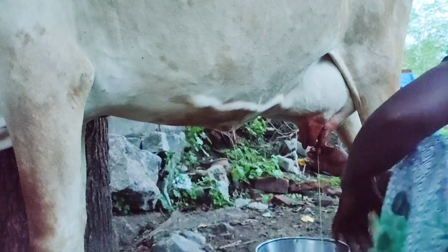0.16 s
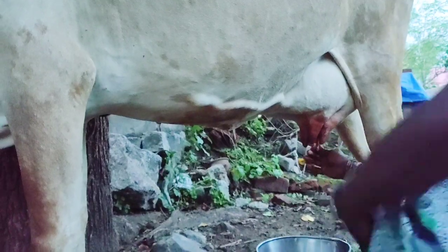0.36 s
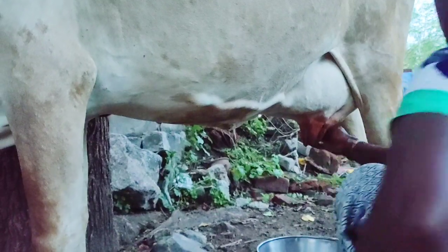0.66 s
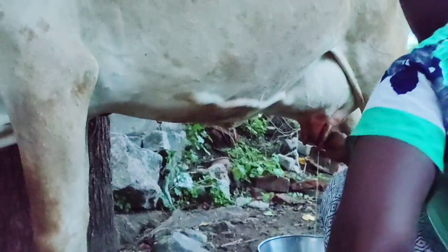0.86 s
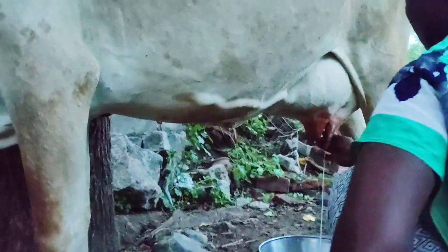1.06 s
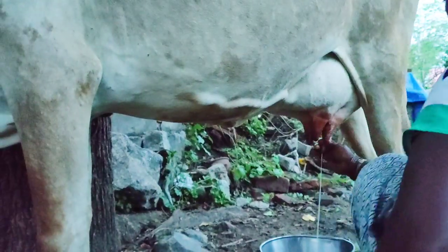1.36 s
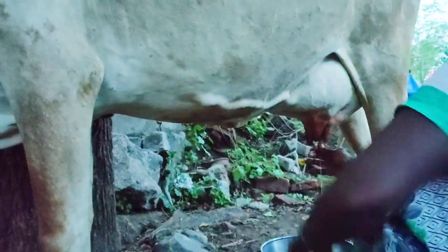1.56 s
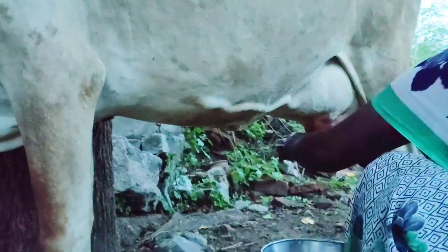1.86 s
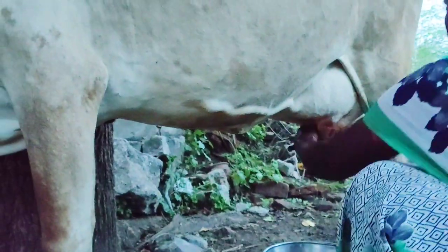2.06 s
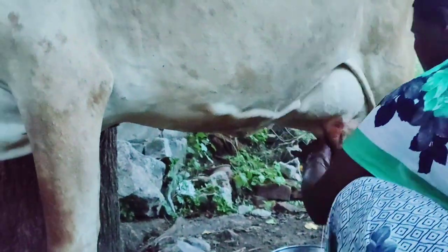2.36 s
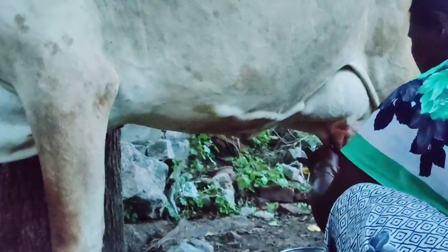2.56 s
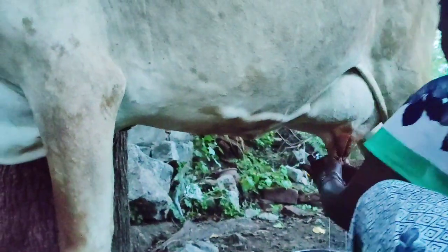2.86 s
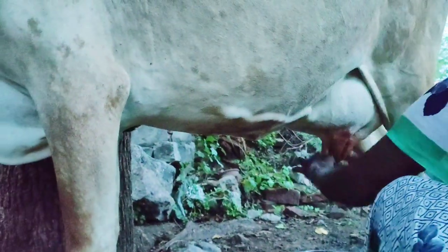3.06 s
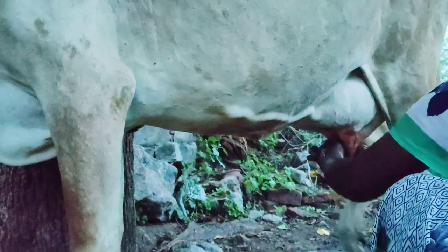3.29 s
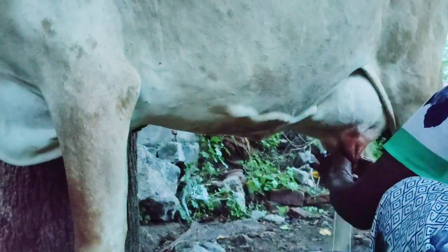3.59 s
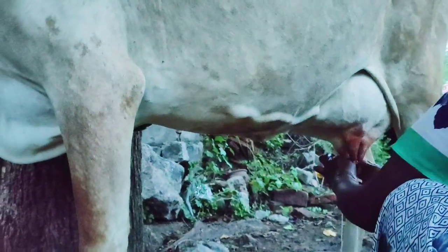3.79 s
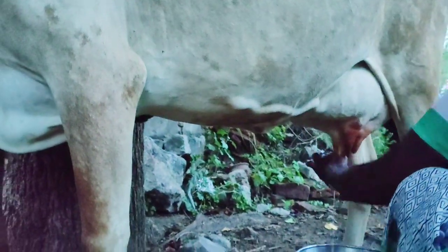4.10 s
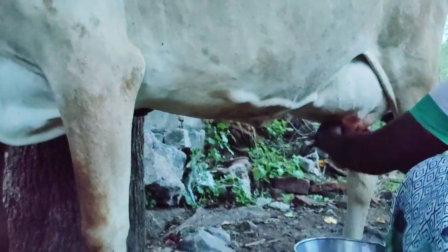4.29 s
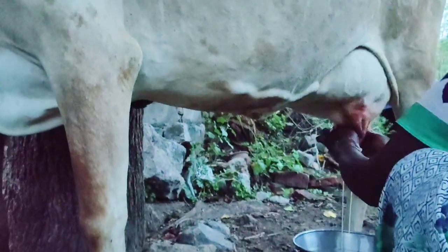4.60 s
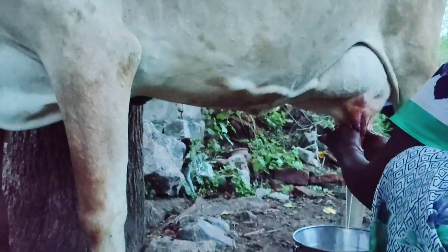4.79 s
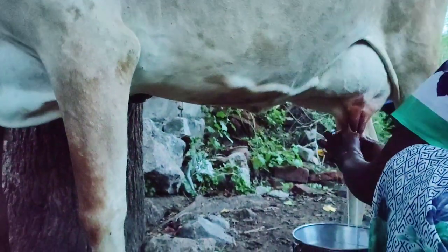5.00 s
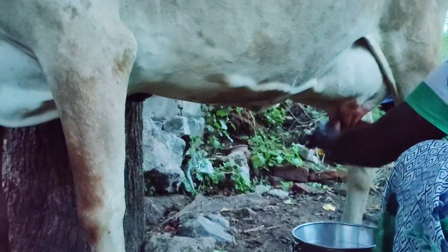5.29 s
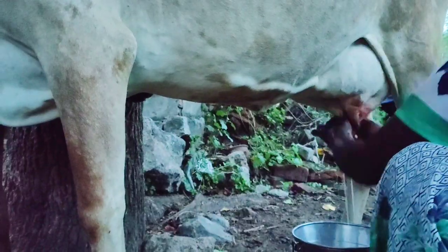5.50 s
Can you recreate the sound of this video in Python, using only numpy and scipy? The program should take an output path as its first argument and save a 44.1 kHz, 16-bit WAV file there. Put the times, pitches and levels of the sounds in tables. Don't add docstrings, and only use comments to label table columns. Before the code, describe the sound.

Hand milking outdoors: thin squirts spatter on a metal pail with sliding, tinny ringing, pauses between them filled by soft steady insect buzz.

```python
import sys
import numpy as np
from scipy import signal
from scipy.fft import rfft, irfft, next_fast_len
from scipy.io import wavfile
from scipy.ndimage import uniform_filter1d, map_coordinates

SR = 44100
rng = np.random.default_rng(int(sys.argv[2]) if len(sys.argv) > 2 else 0)


def pcm_store(signal):
    levels = np.round(np.clip(np.atleast_2d(signal), -1, 1) * 32767)
    wavfile.write(sys.argv[1], SR, levels.astype(np.int16).T)


def makeup_ratio(level_db):
    decades = np.asarray(level_db, float) / 20
    return 10 ** decades


N = 249165


def unit(x):
    return x / np.sqrt(np.mean(np.abs(x) ** 2) + 1e-20)


def along(points, hz):
    f, v = np.transpose(points)
    return np.interp(np.log(hz + 1), np.log(f + 1), v)


def curve(points):
    s, v = np.transpose(points)
    return np.interp(np.arange(N) / SR, s, v)


def wobble(rate):
    knots = rng.standard_normal(int(N * rate / SR) + 4)
    return map_coordinates(knots, [np.arange(N) * rate / SR], order=1)


def filtered(x, response):
    m = next_fast_len(N + 8192)
    return irfft(rfft(x, m) * response(np.fft.rfftfreq(m, 1 / SR)), m)[..., :N]


def spread(a, b, alike):
    turn = np.arccos(np.clip(alike, -1, 1)) / 2
    return np.array([np.cos(turn) * a + np.sin(turn) * b, np.cos(turn) * a - np.sin(turn) * b])


def rush(spectrum, alike, patchy_db):
    hz, _, z = signal.stft(rng.standard_normal((2, N)), SR, nperseg=512)
    field = uniform_filter1d(rng.standard_normal(z.shape[1:]), size=4, axis=0)
    field = uniform_filter1d(field, size=8, axis=1)
    z = z * makeup_ratio(patchy_db * unit(field))
    pair = signal.istft(spread(z[0], z[1], along(alike, hz)[:, None]), nperseg=512)[1][:, :N]
    return unit(filtered(pair, lambda f: makeup_ratio(along(spectrum, f))))


def shaken(shape, width_hz):
    pole = np.exp(-np.pi * np.abs(width_hz) / SR)
    kicks = rng.standard_normal(shape) + 1j * rng.standard_normal(shape)
    return unit(signal.lfilter([1], np.poly([pole, pole]), kicks))


def tones(rows, width_hz, rough, edge_db, tail, alike):
    size, lead, longest = SR // 8 * 4, .025, .38
    out, t = np.zeros((2, N + 2 * size)), np.arange(size) / SR
    for start, rise_ms, fall_ms, hz0, hz1, db in rows:
        flutter = shaken((2, size // 4), 4 * width_hz).repeat(4, axis=1)
        end = min(lead + (rise_ms + fall_ms) / 1000, longest)
        peak = min(lead + rise_ms / 1000, end)
        knots = np.array([0, lead, peak, end, end + min(tail, .1)])
        level = makeup_ratio(db + np.interp(t, knots, [-40, edge_db, 0, edge_db, -50], right=-200))
        waver = 1 + .004 * np.sin(2 * np.pi * (9 * t + start * hz0))
        pitch = np.interp(t, [lead, end], [hz0, hz1]) * waver
        left = 1 - rough + rough * flutter[0]
        right = (1 - rough) * 1j + rough * flutter[1]
        swing = spread(left, right, along(alike, hz0))
        carrier = np.exp(2j * np.pi * np.cumsum(pitch) / SR)
        at = size + round((start - lead) * SR)
        out[:, at:at + size] += np.sqrt(2) * level * np.real(swing * carrier)
    return out[:, size:size + N]


def swells(rows, rise_share=.38):
    return [(s, rise_share * ms, (1 - rise_share) * ms, hz0, hz1, db) for s, ms, hz0, hz1, db in rows]


# (frequency [Hz], level [dB per Hz])
AIR_SPECTRUM = [(21, -43), (35, 1), (92, -1.5), (132, -8), (168, -8), (340, -10), (600, -17), (860, -15.5),
                (1390, -26), (2000, -23), (3590, -26), (4300, -23.5), (5590, -64.5), (9460, -120)]
# (frequency [Hz], left-right likeness [-1 to 1])
FAR_ALIKE = [(60, .8), (400, .75), (900, .3), (8000, .3)]


def rumble_and_rustle():
    rumble_db = -61.5 + 1.6 * wobble(1.5)
    rustle_db = -65 + wobble(2.3)
    air = rush(AIR_SPECTRUM, FAR_ALIKE, patchy_db=1.2)
    rumble = filtered(air, lambda f: f < 220)
    return makeup_ratio(rumble_db) * unit(rumble) + makeup_ratio(rustle_db) * unit(air - rumble)


# (start [s], length [ms], start pitch [Hz], end pitch [Hz], level [dB])
BIRD_NOTES = [(.56, 140, 270, 330, -64), (2.5, 350, 285, 280, -66), (1.6, 300, 890, 850, -73),
              (3.24, 170, 790, 740, -67), (3.94, 120, 810, 830, -60), (4.08, 120, 830, 800, -61),
              (1.92, 110, 3720, 3620, -69), (2.03, 60, 3550, 3400, -76), (2.09, 70, 3270, 3220, -76),
              (1.98, 220, 180, 180, -64), (.2, 350, 1030, 980, -69), (4.25, 200, 880, 800, -70),
              (5.05, 200, 900, 850, -71)]


def birds():
    return tones(swells(BIRD_NOTES), width_hz=18, rough=.4, edge_db=-6, tail=.04, alike=FAR_ALIKE)


# (time [s], pitch [Hz], peak level [dB], decay by 60 dB [s])
HOOF_STEP = (1.296, 135, -38, .04)


def hoof():
    start, hz, db, t60 = HOOF_STEP
    t = np.clip(np.arange(N) / SR - start, 0, None)
    return makeup_ratio(db - 60 * t / t60) * np.sin(2 * np.pi * hz * t)


# (frequency [Hz], level [dB per Hz])
CICADA_SPECTRUM = [(2410, -57.5), (4150, -30.5), (4350, -14.5), (4780, -8.5), (5010, -0.5), (5500, -6.5),
                   (6030, -9.5), (6380, -12), (7250, -15), (8000, -31.5), (10400, -65), (17600, -120)]
# (time [s], level [dB])
CHORUS_LEVEL = [(0, -58.5), (2.5, -56), (5.65, -53)]
# (pitch [Hz], pulse rate [per s], level re chorus [dB])
NEAR_SINGERS = [(4930, 66, -7), (6000, 57, -14)]


def cicadas():
    t = np.arange(N) / SR
    chorus = rush(CICADA_SPECTRUM, FAR_ALIKE, patchy_db=2.5)
    for hz, rate, db in NEAR_SINGERS:
        beat = np.cumsum(rate * (1 + .02 * wobble(3))) / SR
        pulses = np.exp(1.6 * np.cos(2 * np.pi * beat))
        voice = np.real(shaken((2, N), 14) * np.exp(2j * np.pi * hz * t))
        chorus = chorus + makeup_ratio(db) * unit(pulses * voice)
    return makeup_ratio(curve(CHORUS_LEVEL) + 1.2 * wobble(1.866)) * chorus


# (lower [Hz], upper [Hz])
MODE_GROUP_EDGES = (1500, 3300)
MIDDLE_SHARE = 0.51
FAINT_HZ, FAINT_MS, FAINT_PER_S = (1487, 5230), (140, 310), 18
FAINT_DB, FAINT_SCATTER_DB = -16, 1


def faint_modes():
    notes = []
    for jet, (_, slide, ringing_db) in zip(JET_FORCE, WALL_STATE):
        s, force = np.transpose(jet)
        count = int(FAINT_PER_S * (s[-1] - s[0]))
        for k, (late, long, high, size) in enumerate(rng.random((30, 4))[:count]):
            start = s[0] + (k + late) / FAINT_PER_S
            ms = np.interp(long, [0, 1], FAINT_MS)
            hz = np.exp(np.interp((k * .618 + high / 6) % 1, [0, 1], np.log(FAINT_HZ)))
            db = np.interp([start, start + ms / 1000], s, force).min()
            if db <= -52:
                continue
            if hz < MODE_GROUP_EDGES[1]:
                db += MIDDLE_SHARE * np.interp(start, *np.transpose(JET_AIM))
            db += ringing_db + FAINT_DB + FAINT_SCATTER_DB * (2 * size - 1)
            notes.append((start, ms, hz, hz * (1 + 2 * slide * ms / 1000), db))
    return tones(swells(notes), width_hz=16, rough=.6, edge_db=-5.5, tail=.08, alike=POT_ALIKE)


# (start [s], length [ms], pitch [Hz], level [dB])
DEEP_NOTES = [(0, 32, 1030, -45.5), (0.022, 165, 1165, -59), (.83, 27, 1156, -47.5),
              (0.849, 81, 1216, -38.5), (0.849, 102, 1124, -33.5), (.83, 300, 1003, -35.5),
              (1.0, 290, 1125, -25.5), (1.03, 86, 1175, -34.5), (1.04, 170, 1034, -44),
              (1.19, 235, 1154, -27), (1.34, 69, 1125, -34), (2.21, 170, 976, -45), (2.32, 194, 1035, -43),
              (2.371, 250, 960, -49), (2.46, 127, 1080, -43), (2.53, 264, 1039, -52.5),
              (3.471, 116, 1341, -38.5), (3.48, 143, 950, -41.5), (3.53, 134, 1191, -35),
              (3.731, 106, 1220, -45.5), (4.491, 145, 952, -42.5), (4.609, 54, 969, -35.5),
              (4.64, 79, 1057, -43.5), (4.78, 215, 1340, -42), (4.788, 130, 942, -39),
              (4.909, 44, 1150, -32.5), (4.918, 32, 1321, -30), (5.49, 53, 873, -53), (5.53, 46, 944, -51),
              (5.549, 50, 1155, -28.5)]
# (start [s], length [ms], pitch [Hz], level [dB])
UPPER_NOTES = [(0, 38, 3840, -39.5), (0.101, 103, 4095, -39.5), (.9, 81, 3890, -36.5),
               (0.972, 140, 2978, -39.5), (.98, 57, 4910, -38.5), (1.009, 144, 4003, -33),
               (1.03, 100, 2190, -36.5), (1.19, 177, 2156, -41.5), (1.2, 124, 4920, -39.5),
               (1.15, 180, 1980, -49), (1.38, 130, 3640, -40.5), (1.4, 266, 1932, -56.5),
               (3.439, 51, 4390, -40.5), (2.251, 210, 3230, -44), (2.3, 130, 2354, -45),
               (2.308, 150, 3925, -36.5), (2.339, 290, 3760, -41), (2.429, 67, 4360, -39),
               (2.43, 230, 1994, -40.5), (2.472, 270, 2682, -42.5), (2.52, 140, 3203, -38.5),
               (2.59, 190, 4190, -40.5), (2.609, 110, 1870, -32.5), (3.459, 155, 1635, -46),
               (3.49, 62, 2145, -42), (3.679, 178, 1630, -42), (3.76, 80, 1980, -40),
               (4.65, 140, 1694, -42.5), (4.709, 78, 2387, -42.5), (5.51, 48, 1945, -37.5),
               (.09, 80, 5140, -51), (.14, 115, 3520, -53.5), (1.149, 300, 2743, -51),
                 (2.36, 250, 4450, -43), (1.0, 390, 7585, -44.5), (1.38, 170, 1776, -48),
                 (.04, 170, 1044, -61.5), (1.4, 140, 3345, -47.5), (1.42, 160, 4520, -52),
                 (2.72, 180, 2035, -60), (2.7, 93, 4760, -41), (2.72, 108, 1005, -49.5),
                 (3.559, 220, 1522, -47), (3.65, 135, 2632, -44.5), (4.529, 90, 2360, -49),
                 (4.898, 61, 1930, -42.5), (4.9, 80, 4200, -41.5), (5.51, 61, 1566, -40.5)]
DEEP_CLIMB, DEEP_CLIMB_PER_S = .018, .004
UPPER_SLIDE = 2.2


def singing():
    deep = []
    for s, ms, hz, db in DEEP_NOTES:
        deep.append((s, ms, hz, hz * (1 + DEEP_CLIMB + DEEP_CLIMB_PER_S * s), db))
    jet_times = [jet[1][0] for jet in JET_FORCE]
    wall_slides = [wall[1] for wall in WALL_STATE]
    upper = []
    for s, ms, hz, db in UPPER_NOTES:
        slide = UPPER_SLIDE * np.interp(s, jet_times, wall_slides)
        upper.append((s, ms, hz, hz * (1 + slide * ms / 1000), db))
    notes = swells(deep, rise_share=.46) + swells(upper)
    return tones(notes, width_hz=41.5, rough=0.55, edge_db=-5, tail=0.082, alike=POT_ALIKE)


# (mode width [Hz], slide of tuning [per s], ringing over splash [dB])
WALL_STATE = [(14, -.03, 9), (9, -.04, 12), (9, -.06, 12), (22, .03, 6), (30, .03, 5), (24, .03, 6)]
MODE_COUNT = 110


def pot(splash):
    out, t = np.zeros((2, N + SR)), np.arange(SR)
    f, order = np.arange(SR // 5), np.arange(MODE_COUNT)[:, None]
    for jet, (width, slide, db) in zip(JET_FORCE, WALL_STATE):
        at, stop = round(jet[0][0] * SR), round(jet[-1][0] * SR)
        place, strength = rng.random((2, MODE_COUNT, 1))
        hz = 650 + 7250 * ((order + place) / MODE_COUNT) ** 1.25
        wide = width * np.sqrt(hz / 2500 + 1500 / hz)
        gain = (-1) ** order * makeup_ratio(13.6 * strength)
        wall = (gain * 1j * f * wide / (hz * hz - f * f + 1j * f * wide)).sum(0)
        wall = wall / np.sqrt(uniform_filter1d(np.abs(wall) ** 2, size=1000))
        ring = irfft(rfft(splash[:, at:stop], SR)[:, :len(f)] * wall, SR)
        middle = (stop - at) / 2
        warp = t + slide / SR * (t * t / 2 - middle * t)
        out[:, at:at + SR] += makeup_ratio(db) * np.array([np.interp(warp, t, side) for side in ring])
    return out[:, :N]


# (time [s], level [dB])
JET_FORCE = [
    [(0, -41.5), (.06, -48.5), (.105, -40), (.16, -44.5), (.21, -49.5), (.25, -59), (.32, -56),
     (.37, -78.5)],
    [(.8, -90), (.83, -52.5), (.93, -42), (1.14, -40), (1.3, -38.5), (1.44, -42.5), (1.52, -51.5),
     (1.64, -82)],
    [(2.18, -81.5), (2.26, -53.5), (2.32, -45), (2.4, -39.5), (2.6, -37.5), (2.77, -46), (2.88, -51.5),
     (3.02, -71.5)],
    [(3.41, -81), (3.44, -46), (3.55, -45.5), (3.7, -39.5), (3.85, -35.5), (3.93, -43.5), (3.97, -56),
     (4.04, -73)],
    [(4.42, -87), (4.46, -44.5), (4.55, -39), (4.7, -39), (4.94, -36), (4.99, -43.5), (5.04, -48.5),
     (5.11, -67)],
    [(5.44, -85.5), (5.48, -40), (5.51, -40.5), (5.58, -41.5), (5.63, -38.5), (5.65, -44)],
]
# (time [s], low modes over high [dB])
JET_AIM = [(0, -14), (.1, -36), (.6, -8.5), (1.42, -12.5), (2.2, -3), (2.3, -6), (2.45, -20.5),
           (2.75, -8.5), (2.86, -22.5), (3.44, -18), (3.5, -1), (3.72, -2.5), (3.88, -25), (4.46, -4),
           (4.95, -4.5), (5.1, -22.5), (5.48, -28.5), (5.52, 2)]
MIDDLE_GAIN = [-0.5, -2.5, 2.5, 1, 1, 1.5]
DRIBBLE_DB, DRIBBLE_DULLS = -46, .4
SPUTTER_DB = 1.2


def jet_drive():
    t, drive, aim_db = np.arange(N) / SR, np.zeros((3, N)), curve(JET_AIM)
    for jet, middle_db in zip(JET_FORCE, MIDDLE_GAIN):
        span = slice(round(jet[0][0] * SR), round(jet[-1][0] * SR))
        force, aim = np.interp(t[span], *np.transpose(jet)), aim_db[span]
        dribble = DRIBBLE_DULLS * np.minimum(force - DRIBBLE_DB, 0) * (t[span] > jet[3][0])
        middle = force + middle_db + MIDDLE_SHARE * aim + dribble
        drive[:, span] = makeup_ratio([force + aim, middle, force])
    return drive * makeup_ratio(SPUTTER_DB * wobble(20))


# (frequency [Hz], level [dB per Hz])
SPATTER_SPECTRUM = [(250, -48.5), (620, -30.5), (880, -24), (960, -10.5), (1200, -18), (1900, -13.5),
                    (3000, -17), (4350, -6), (5900, -15.5), (7450, -11.5), (8000, -35), (9000, -120)]
# (frequency [Hz], left-right likeness [-1 to 1])
POT_ALIKE = [(900, 0.77), (1500, 0.84), (2300, 0.63), (4000, 0.93), (8000, 0.96)]


def spatter(drive):
    splash = rush(SPATTER_SPECTRUM, POT_ALIKE, patchy_db=3.5) * makeup_ratio(2.5 * wobble(300))
    above = lambda f, edge: 1 / (1 + (edge / (f + 1)) ** 12)
    low, high = MODE_GROUP_EDGES
    bands = [lambda f: 1 - above(f, low),
             lambda f: above(f, low) - above(f, high),
             lambda f: above(f, high)]
    return sum(makeup_ratio(-10) * force * unit(filtered(splash, band)) for force, band in zip(drive, bands))


def scene():
    background = rumble_and_rustle() + birds() + hoof() + cicadas()
    splash = spatter(jet_drive())
    return background + faint_modes() + singing() + pot(splash) + splash


def band_limit(x):
    return signal.sosfilt(signal.butter(12, 8810, fs=SR, output="sos"), x)


# (frequency [Hz], left over right [dB])
PORT_BALANCE = [(500, -0.1), (1200, 3), (2000, 8), (3300, 7.5), (4500, 18.5), (5200, 12), (5800, 3),
                (6500, -5), (7900, -20)]
TOP_HZ, LAG_S = 8020, 5.5e-5


def record(dry):
    left_share = lambda f: 1 / (1 + makeup_ratio(-2 * along(PORT_BALANCE, f)))
    gain = lambda f: np.sqrt(2 * np.array([left_share(f), 1 - left_share(f)]))
    lag = lambda f: np.exp(1j * np.pi * f * np.array([[-LAG_S], [LAG_S]]))
    mix = filtered(dry, lambda f: gain(f) * lag(f) * (f < TOP_HZ))
    return band_limit(mix)


dry = scene()
out = record(dry)
pcm_store(out)
```